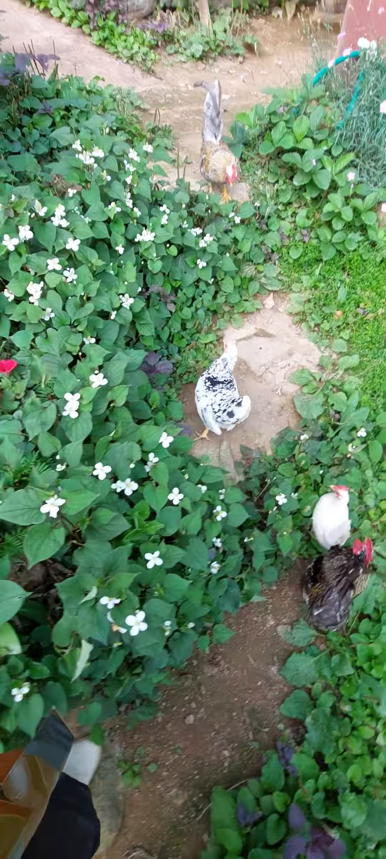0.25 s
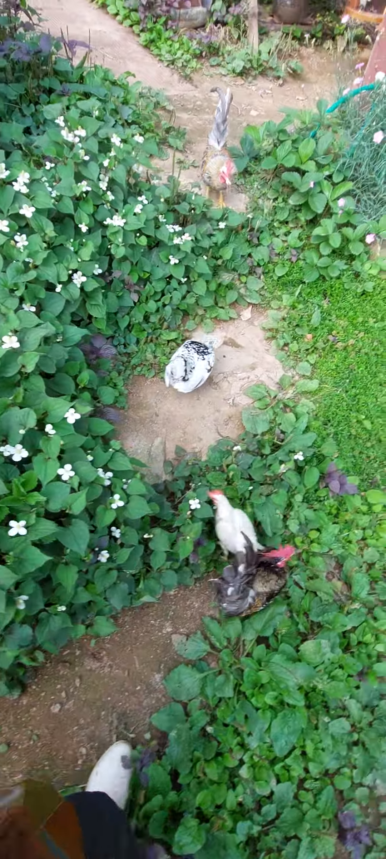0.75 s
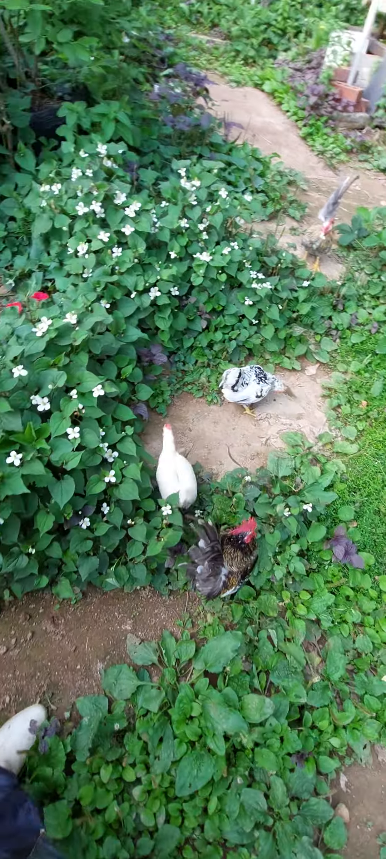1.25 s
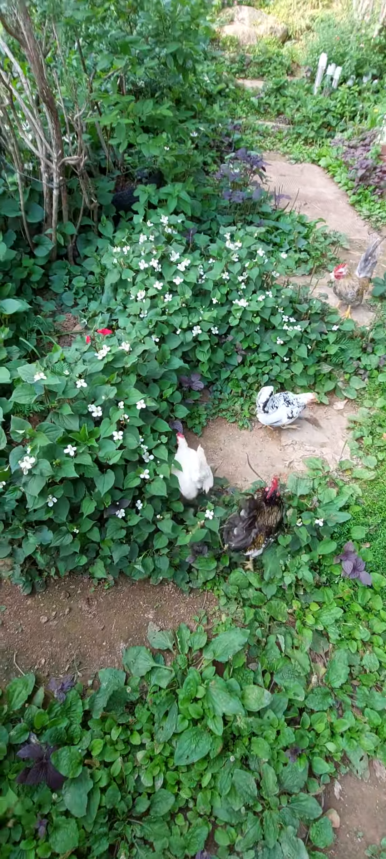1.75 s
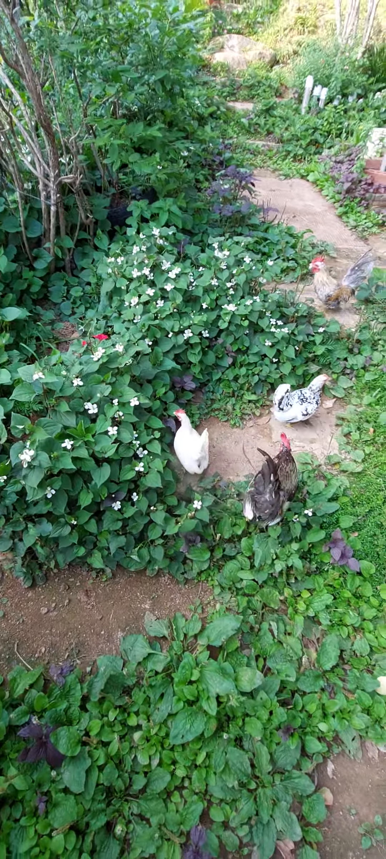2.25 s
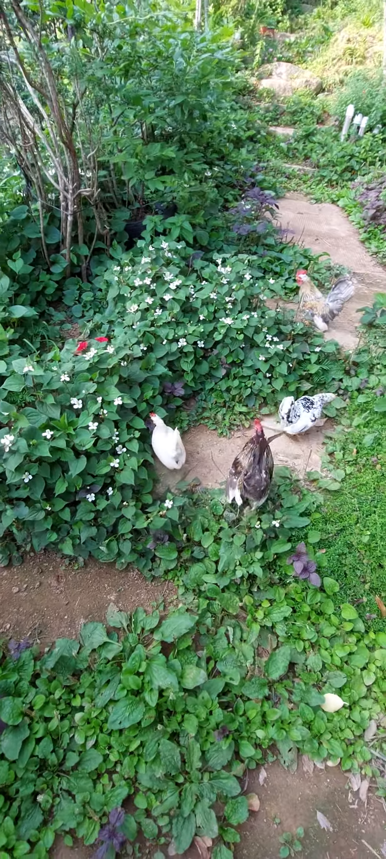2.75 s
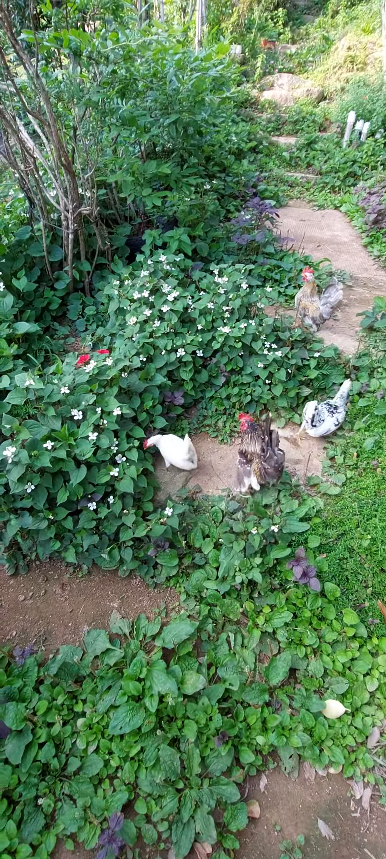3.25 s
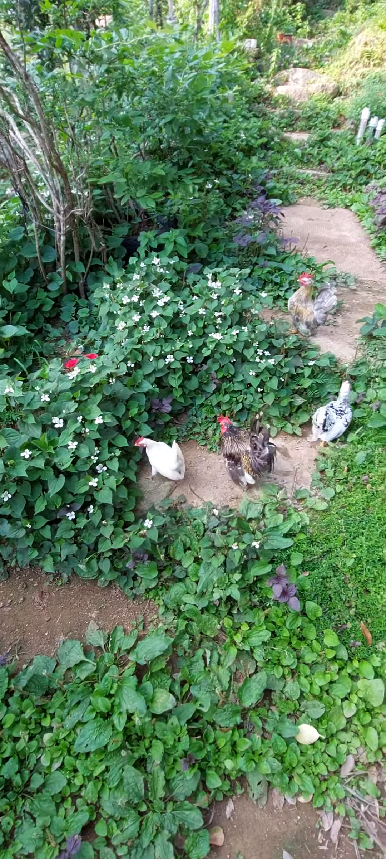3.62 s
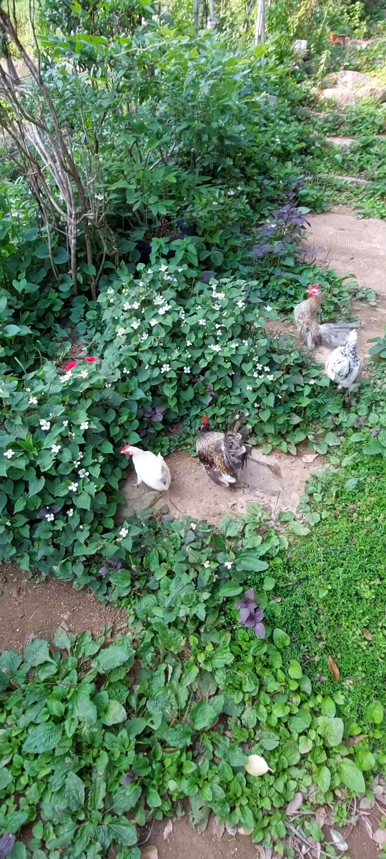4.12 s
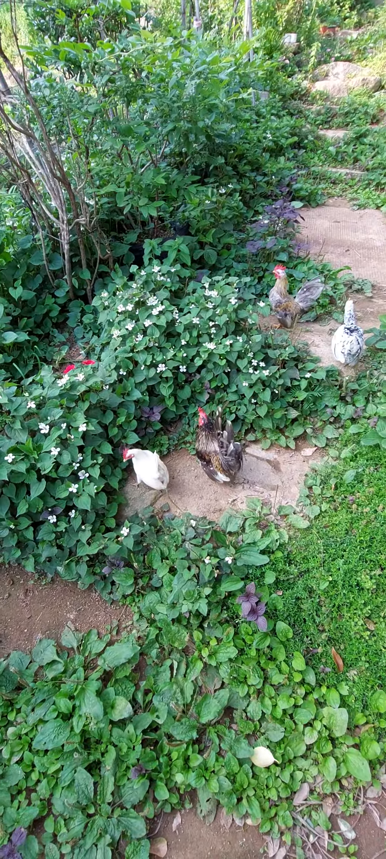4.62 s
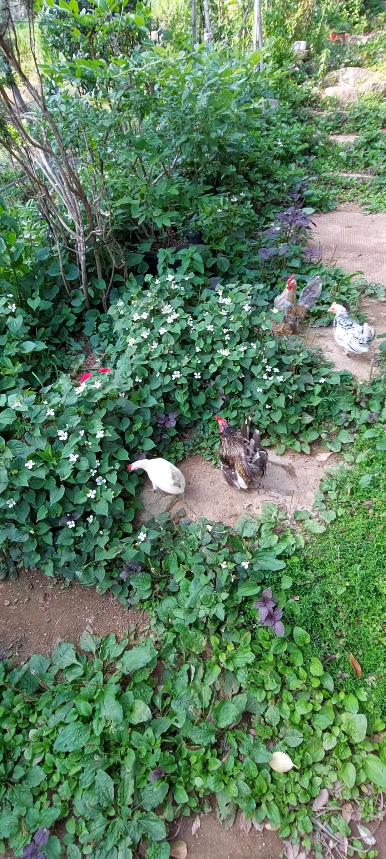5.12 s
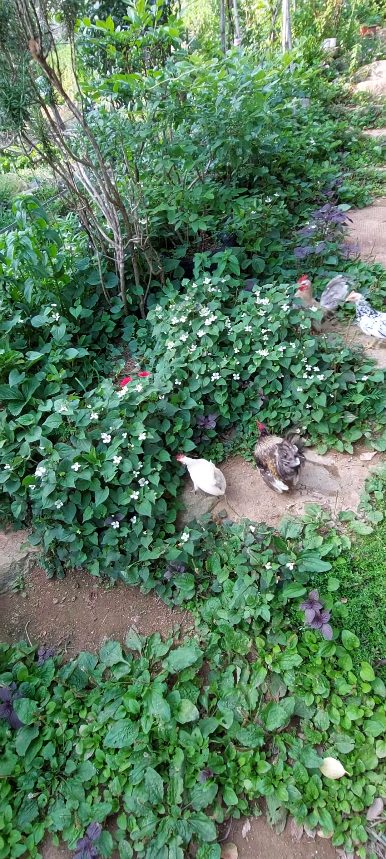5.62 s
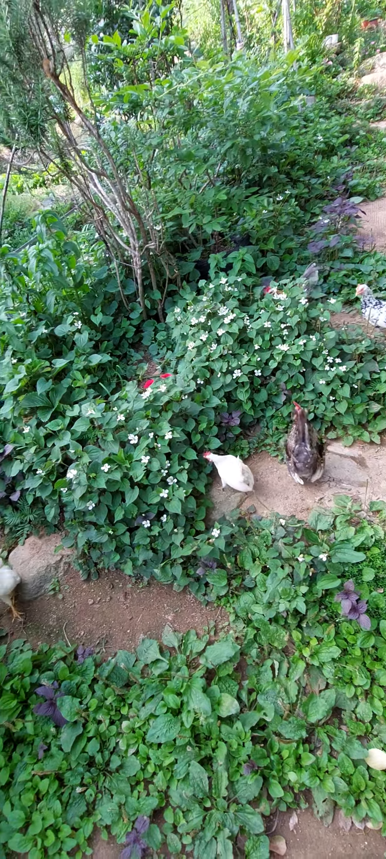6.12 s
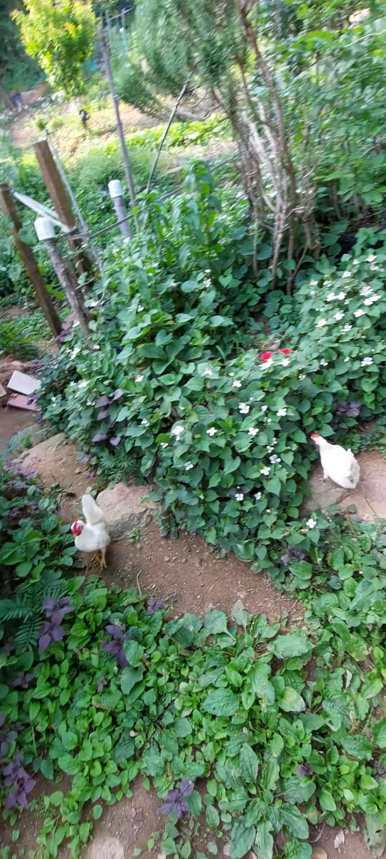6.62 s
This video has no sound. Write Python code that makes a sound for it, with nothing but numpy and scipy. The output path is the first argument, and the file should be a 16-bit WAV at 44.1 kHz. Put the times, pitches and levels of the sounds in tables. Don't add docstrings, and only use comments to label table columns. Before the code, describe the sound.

Short rising clucks from several hens, some round, some nasal or hoarse, overlap with brushing foliage, sharp ticks and small pecks on earth and stone. The clucking thins and drops to throaty croaks and squawks later. Dull low wind thumps hit mostly the right side twice, over a quiet open-air garden background, picked up by a phone a few steps away.

```python
import sys
import numpy as np
from scipy import signal
from scipy.fft import rfft, irfft
from scipy.io import wavfile
from scipy.ndimage import uniform_filter1d

SR = 44100
rng = np.random.default_rng(int(sys.argv[2]) if len(sys.argv) > 2 else 0)


def gain_from_db(level_db):
    decades = np.asarray(level_db, float) / 20
    return 10 ** decades


def to_wav(sig):
    pcm = np.clip(np.atleast_2d(sig), -1, 1) * 32767
    pcm = np.round(pcm).astype(np.int16)
    wavfile.write(sys.argv[1], SR, pcm.T)


N = 302790


def evened(x):
    return x / np.sqrt(np.mean(x ** 2) + 1e-20)


def read(points, hz):
    f, value = np.transpose(points)
    return np.interp(np.log(hz + 1), np.log(f + 1), value)


def curve(rows):
    s, level_db = np.transpose(rows)
    return np.interp(np.arange(N) / SR, s, level_db)


def swells(rows):
    s, db, rise_s, fall_s = np.transpose(rows)[:, :, None]
    t = np.arange(0, N + 64, 64) / SR
    below_peak_db = 20 * np.maximum((s - t) / abs(rise_s), (t - s) / abs(fall_s))
    return np.interp(np.arange(N) / SR, t, (db - below_peak_db).max(0))


def sides(pan_db):
    return gain_from_db(np.array([pan_db / 2, -pan_db / 2]))


def add(mix, s, sound):
    part = mix[:, round(s * SR):][:, :sound.shape[1]]
    part += sound[:, :part.shape[1]]


def colour(x, points):
    hz = np.fft.rfftfreq(x.shape[-1], 1 / SR)
    return irfft(rfft(x) * gain_from_db(read(points, hz)), x.shape[-1])


def ringing(edges_hz, size):
    band = signal.butter(2, edges_hz, "band", fs=SR)
    return signal.lfilter(*band, rng.standard_normal((2, size)))


def hiss(points, patchy_db, size):
    # (frequency [Hz], left-right likeness [0-1])
    likeness = [(290, 0.85), (640, 0.45), (1400, 0.07)]
    frames, hz = 4 * N // size + 5, np.fft.rfftfreq(size, 1 / SR)
    a, b, c, d, patches = rng.standard_normal((frames, len(hz), 5)).T
    patches = uniform_filter1d(patches, size=10, axis=0)
    patches = evened(uniform_filter1d(patches, size=8, axis=1))
    same = np.clip(read(likeness, hz), -1, 1)[:, None]
    left = a + 1j * b
    right = same * left + np.sqrt(1 - same ** 2) * (c + 1j * d)
    z = np.array([left, right]) * gain_from_db(read(points, hz)[:, None] + patchy_db * patches)
    return evened(signal.istft(z, nperseg=size, noverlap=3 * size // 4)[1][:, :N])


def cluck(length_s, hz0, hz1, db, top, second_db, third_db, fourth_db, higher_db, beak_db, attack_s,
          throat, rough, pan_db, lead):
    rasp_hz, rasp_width_hz = 944, 506
    air_db = -4
    swell_db_per_s = 1700
    rough = np.clip(rough, 0, .75)
    whole_s = length_s + .006
    u = np.arange(round(whole_s * SR)) / whole_s / SR

    wobble = uniform_filter1d(uniform_filter1d(rng.standard_normal((2, 7000)), size=90), size=90)
    wobble = evened(wobble)[:, :len(u)]
    hz = (hz0 + (hz1 - hz0) * np.sin(np.pi / 2 * u)) * (1 + .08 * rough * wobble[0])
    turns = np.cumsum(hz) / SR

    k = np.arange(1, 19)[:, None]
    uneven_db, lag, shift = rng.standard_normal((3, *k.shape))
    level_db = np.where(k > 4, higher_db + read(throat, k * hz) + 2.5 * uneven_db, 0)
    level_db = level_db + second_db * (k == 2) + third_db * (k == 3) + fourth_db * (k == 4)
    level_db = level_db + beak_db * (u - .5) * (k > 1)
    phase = 2 * np.pi * k * turns - .9 * k ** 2 + .5 * lag
    port_leads = (0, lead + .45 * shift * (k > 2))
    voice = np.array([(gain_from_db(level_db) * np.cos(phase + s)).sum(0) for s in port_leads])
    beat = 1 + rough * (.5 * np.cos(np.pi * turns) + 1.3 * rough * wobble[1])

    edges_hz = rasp_hz + rasp_width_hz * np.array([-.5, .5])
    rasp = evened(ringing(edges_hz, 7000))[:, -len(u):]
    air = evened(colour(rng.standard_normal((2, 7000)), [(1200, -60), *throat]))[:, :len(u)]
    air = gain_from_db(min(higher_db, 0) + air_db) * rough * air

    top = np.clip(top, .25, .8)
    rise = np.minimum(u * length_s / max(attack_s, 1 / SR), 1)
    rise = rise * gain_from_db(-swell_db_per_s * attack_s * np.maximum(1 - u / top, 0))
    fall = np.cos(np.pi / 2 * np.maximum(u - top, 0) / (1 - top)) ** 1.3
    sound = evened(voice) * beat + 1.5 * rough ** 2 * rasp + air
    return gain_from_db(db) * sides(pan_db)[:, None] * sound * rise * fall


def hedge(x):
    # (frequency [Hz], t60 [s])
    echo_t60 = [(300, 0.11), (1300, .14), (3000, .25), (6000, 0.34)]
    taps = np.zeros((2, SR // 2))
    at = np.arange(100, SR // 2 - 20, 20) + rng.integers(0, 20, (2, (SR // 2 - 101) // 20))
    np.put_along_axis(taps, at, rng.choice([-1., 1.], at.shape), 1)
    hz, t, z = signal.stft(taps, SR, nperseg=256)
    tail = signal.istft(z * gain_from_db(-60 * t / read(echo_t60, hz)[:, None]), SR, nperseg=256)[1]
    return signal.fftconvolve(x, tail / np.linalg.norm(tail[0]), axes=1)[:, :N]


def hens():
    # (frequency [Hz], level [dB])
    plain_throat = [(1700, 2.5), (2500, 4.5), (3200, -5.5), (4200, -8), (5500, -9.5), (6800, -31.5),
                    (9000, -27)]
    narrow_throat = [(2400, -16), (3300, -18), (4100, -5), (4700, -16), (5300, -28), (9000, -38)]
    far_throat = [(1700, 4), (2500, -1.5), (3200, -6.5), (4200, -13), (5000, -20.5), (6500, -24.5),
                  (9000, -46)]
    low_throat = [(1800, 5.5), (2400, -12), (2900, -8), (3500, -31), (4400, -20), (9000, -49.5)]
    open_throat = [(2400, -10), (3100, -5), (3600, -2), (4300, 0), (5000, -7), (5800, -14), (7000, -30),
                   (9000, -40)]
    hollow_throat = [(1800, 5.5), (2400, -10), (3000, -24), (3700, -22), (4500, -8), (5200, -16),
                     (6200, -40), (9000, -50)]
    # (loudest point [0-1], 2nd [dB], 3rd [dB], 4th [dB], higher overtones [dB],
    # their change as the beak moves [dB], attack [s])
    round_voice = (.6, -23, -33, -44, -50, -30, .004)
    nasal_voice = (.45, 5.5, -11, -20, -15, -7, .004)
    shrill_voice = (.65, -8, -9, -12, -11, -1, .005)
    hoarse_voice = (0.33, -14.5, -18, -20, -22, 3, .003)
    deep_voice = (0.5, 4.5, -6, -5.5, -14, -10, .003)
    plain_voice = (.5, 0, -9, -18, -18, -7, .004)
    soft_voice = (.4, 4, -10, -22, -18, -4, .002)
    croaking_voice = (0.4, 6, 7.5, 0.5, -10, -3, .004)
    squawking_voice = (0.35, 13.5, -2, 5.5, -5, 6.5, .001)
    moaning_voice = (2.2, -3, 20, 18, -3, -9, .003)
    sharp_voice = (.4, 12, 6, -5, -4, 0, .001)
    clear_voice = (.5, 10, 12.5, 4, -2.5, 4, .002)
    bright_voice = (.55, -9, -11, -22, -11, 0, .005)
    mild_voice = (.55, 1, -7, -26, -15, -4, .004)
    rasping_voice = (.4, 3, 2, 6, 8, 0, .002)
    # (time [s], length [s], first pitch [Hz], last pitch [Hz], level [dB])
    round_hen = [
        (0.629, 0.023, 640, 729, -27),
        (2.035, 0.031, 760, 740, -50.5),
        (2.195, 0.021, 576, 680, -34),
        (2.323, 0.038, 626, 840, -31),
        (2.476, 0.026, 527, 830, -31),
        (2.505, 0.0094, 780, 760, -32.5),
        (2.632, 0.038, 595, 750, -31.5),
        (6.241, 0.013, 700, 750, -55),
    ]
    nasal_hen = [
        (0.848, 0.026, 522, 560, -36),
        (2.256, 0.03, 542, 573, -30.5),
        (2.4, 0.023, 520, 573, -31),
    ]
    shrill_hen = [
        (1.394, 0.026, 680, 830, -25),
    ]
    hoarse_hen = [
        (1.247, 0.023, 758, 778, -39.5),
        (1.41, 0.024, 1029, 1158, -30),
        (1.562, 0.022, 705, 886, -36),
        (1.744, 0.018, 853, 950, -38.5),
        (1.893, 0.027, 773, 748, -45.5),
        (3.626, 0.028, 638, 730, -47),
        (5.882, 0.016, 700, 732, -40),
    ]
    deep_hen = [
        (3.658, 0.026, 507, 469, -39),
        (3.842, 0.022, 522, 498, -38.5),
        (4.025, 0.019, 570, 550, -49.5),
        (5.49, 0.045, 533, 532, -53),
        (5.868, 0.014, 582, 580, -42),
    ]
    plain_hen = [
        (0.579, 0.022, 680, 604, -56),
        (0.586, 0.012, 544, 500, -42.5),
        (0.82, 0.025, 660, 654, -25.5),
        (1.02, 0.019, 620, 645, -29),
        (1.239, 0.01, 580, 619, -30.5),
        (3.33, 0.13, 1058, 1027, -57.5),
    ]
    soft_hen = [
        (1.868, 0.02, 700, 790, -37),
        (2.095, 0.023, 590, 687, -32.5),
        (2.762, 0.022, 570, 554, -45),
        (2.866, 0.028, 590, 560, -37),
        (4.254, 0.022, 744, 742, -44),
        (5.588, 0.024, 694, 686, -57),
        (5.905, 0.03, 693, 656, -51),
    ]
    croaking_hen = [
        (4.135, 0.017, 376, 375, -47),
        (4.36, 0.045, 400, 350, -44),
        (4.508, 0.043, 387.5, 351, -45.5),
        (4.685, 0.037, 384.3, 363, -44),
        (5.63, 0.028, 355, 363, -41.5),
        (6.645, 0.031, 331.5, 324, -44),
        (6.698, 0.033, 380, 358, -53),
    ]
    squawking_hen = [
        (4.83, 0.029, 370.5, 371, -42),
        (5.137, 0.024, 427, 414, -38.5),
        (5.764, 0.022, 381, 373, -42),
    ]
    moaning_hen = [
        (0.212, 0.117, 391, 353, -53),
    ]
    sharp_hen = [
        (6.072, 0.025, 643, 558, -40),
    ]
    clear_hen = [
        (4.975, 0.02, 382, 366, -43),
        (6.359, 0.02, 320, 375, -39),
    ]
    bright_hen = [
        (1.726, 0.022, 650, 725, -34),
    ]
    mild_hen = [
        (1.951, 0.022, 625, 590, -37),
    ]
    rasping_hen = [
        (5.381, 0.02, 696, 612, -43),
    ]
    # (clucks, voice, throat, roughness [0-1], left-right [dB], lead of the right port [rad])
    flock = [
        (round_hen, round_voice, low_throat, .22, -4, -1.6),
        (nasal_hen, nasal_voice, narrow_throat, .22, 3, .6),
        (shrill_hen, shrill_voice, plain_throat, .22, 0, -.5),
        (hoarse_hen, hoarse_voice, plain_throat, .8, -1, -.6),
        (deep_hen, deep_voice, hollow_throat, .4, 3, -.8),
        (plain_hen, plain_voice, narrow_throat, .25, -1, -.5),
        (soft_hen, soft_voice, hollow_throat, .42, 2, 1.2),
        (croaking_hen, croaking_voice, low_throat, .6, 2, -1.4),
        (squawking_hen, squawking_voice, far_throat, .58, 1, -1.0),
        (moaning_hen, moaning_voice, low_throat, .12, 1, -.5),
        (sharp_hen, sharp_voice, far_throat, .42, 1, -1.0),
        (clear_hen, clear_voice, low_throat, .34, 2, -1.6),
        (bright_hen, bright_voice, open_throat, .2, 0, -.5),
        (mild_hen, mild_voice, open_throat, .2, 0, -.5),
        (rasping_hen, rasping_voice, far_throat, .7, 1, -1.0),
    ]
    out = np.zeros((2, N))
    for clucks, voice, throat, rough, pan_db, lead in flock:
        head_moves = rng.standard_normal((len(clucks), 2))
        for (s, *call), (turn, lean) in zip(clucks, head_moves):
            sound = cluck(*call, *voice, throat, rough, pan_db + 1.5 * turn, lead + .3 * lean)
            add(out, s - .002, sound)
    return out + gain_from_db(-13) * hedge(out)


def wind():
    # (middle [s], peak [dB], frequency [Hz])
    eddies = [(1.49, -20, 110), (1.506, -23, 170), (1.541, -21.5, 171), (1.645, -28, 67), (3.362, -27, 121),
              (3.392, -22.5, 113), (3.417, -20, 134), (3.468, -14, 230), (3.479, -8, 240),
              (3.492, -20, 200), (3.504, -29, 96), (3.538, -12.5, 165), (3.565, -41, 84), (5.363, -27, 97),
              (5.403, -7, 182), (5.415, -16, 130), (5.428, -16, 140), (5.44, -14, 110), (5.472, -5, 190),
              (5.483, -9, 200), (5.499, -7, 127), (5.524, -13, 130), (5.537, -8, 200), (5.55, -20, 150),
              (5.588, -12, 150), (5.598, -16, 130), (5.64, -14.5, 90), (5.8, -17.5, 218), (5.808, -27, 115),
              (5.836, -22, 96), (5.944, -29, 65.5), (6.254, -30, 227)]
    # (time [s], level [dB])
    breeze = [(0.02, -44.5), (0.4, -61.5), (0.71, -49), (1.16, -54.5), (1.25, -47.5), (1.4, -51),
              (1.74, -57.5), (2.41, -55.5), (3.19, -63), (3.45, -43), (3.78, -64), (4.0, -54), (4.67, -57),
              (5.26, -60.5), (5.95, -50.5), (6.5, -66), (6.84, -59)]
    # (frequency [Hz], level [dB per Hz])
    rumble = [(20, -30), (38, 5), (60, 0), (110, 1), (170, -10), (260, -8.5), (400, -18.5), (620, -50),
              (900, -80)]
    gust_under_eddy_db, gust_rise_s, gust_fall_s = 15, .06, .079
    lee_db = -56
    gusts = [(s, db - gust_under_eddy_db, gust_rise_s, gust_fall_s) for s, db, hz in eddies]
    level_db = np.maximum(curve(breeze), swells(gusts))
    gust_db = np.maximum(level_db - lee_db, 0)
    left_db = 3.0 - 1.0 * gust_db
    right_db = np.minimum(0.16 * gust_db, 3) - 1.0
    out = gain_from_db(level_db + np.array([left_db, right_db])) * hiss(rumble, patchy_db=3.0, size=2048)
    for s, db, hz in eddies:
        turns = np.arange(-2, 2, hz / SR)
        swing = np.cos(2 * np.pi * (turns + rng.random((2, 1))))
        swing *= np.cos(np.pi / 4 * turns) ** 2 * np.exp(-(turns / 0.62) ** 2)
        add(out, s - 2 / hz, gain_from_db(db + np.array([[-36], [-1]])) * swing)
    return out


def rustle():
    # (frequency [Hz], level [dB per Hz])
    leaves = [(180, -66), (300, 2.5), (404, 2), (510, -2), (896, -13.5), (1360, -8), (1470, -5.5),
              (3010, -9), (4550, -8), (8700, -14), (11700, -9), (15800, -21)]
    # (peak time [s], level [dB], rise for 20 dB [s], fall for 20 dB [s])
    strokes = [(0.04, -62, .1, .4), (0.33, -53.5, .4, .15), (0.45, -66, .4, 1.5), (0.71, -51, .12, .35),
               (0.85, -53, .3, .4), (2.27, -60, .3, .12), (2.91, -61, .1, .1), (3.82, -69, .04, .6),
               (1.21, -52, .15, .22), (1.41, -52, .4, 1.45), (2.47, -51, .08, .17), (2.8, -62, 1.2, .6),
               (3.37, -59.5, .45, .35), (3.6, -65.5, .5, .27), (4.15, -49, .29, .13), (4.3, -70, .1, .3),
               (4.83, -67, .8, .3), (5.15, -69, .012, .03), (5.65, -64, .021, .09), (5.8, -60, .05, .06),
               (5.88, -54.5, .027, .055), (5.99, -74, .04, .045), (6.085, -66, .015, .03),
               (6.22, -84, .03, .06), (6.84, -76, .6, .4)]
    clicks_per_s = 1500
    clicks = gain_from_db(3.5 * np.minimum(rng.exponential(1, (2, N)), 3))
    clicks *= rng.random((2, N)) < clicks_per_s / SR
    grit = evened(colour(clicks * rng.choice([-1, 1], (2, N)), leaves))
    rub = hiss(leaves, patchy_db=2.2, size=256) + .3 * grit
    return gain_from_db(swells(strokes) + np.array([[4], [2.2]])) * rub


def snaps():
    # (time [s], peak [dB], t60 [s], low part [dB])
    dry_snaps = [(0.6502, -52.5, 0.83, 4), (1.2, -42, 0.13, -1), (1.4944, -45, 0.058, -1),
                 (1.555, -43.5, 0.13, 7), (1.77, -43, 0.058, -2), (2.0411, -52, 0.3, 4),
                 (2.4593, -37, 0.12, 2.5), (3.048, -56, 0.25, 6), (3.3635, -55.5, 0.51, 8.5),
                 (4.031, -66, 0.051, 3), (4.293, -56.5, 0.07, -23), (4.455, -58.5, 0.033, -37),
                 (4.766, -65, 0.26, 12), (5.7942, -44.5, 0.12, -27), (5.87, -42, 0.065, -34),
                 (5.97, -57.5, 0.16, -18), (6.1744, -78, 0.14, -14)]
    # (time [s], peak [dB], low part [dB])
    ticks = [(0.2074, -57, -2), (0.3215, -39, -8), (1.3368, -46.5, 12.5), (1.6741, -41, -6),
             (3.969, -56, -3), (4.0942, -45, 3), (4.1457, -37, 4), (4.152, -38, 1), (4.2398, -54, 4),
             (5.258, -59.5, 6.5), (6.2145, -56.5, -6)]
    tick_t60_s, attack_s = 0.024, 0.00099
    out, t = np.zeros((2, N)), np.arange(8000) / SR
    for s, db, t60_s, low_db in dry_snaps + [(s, db, tick_t60_s, low_db) for s, db, low_db in ticks]:
        burst = rng.standard_normal((2, len(t))) * gain_from_db(-60 * t / t60_s) * np.minimum(t / attack_s, 1)
        tone = [(300, low_db - 79), (1000, low_db + 1.5), (3500, low_db - 12.0),
                (5500, -4.0), (8600, -7.5), (12000, -5.0), (16000, -11.0)]
        add(out, s, gain_from_db(db + 8.0) * sides(0.93)[:, None] * colour(burst, tone))
    return out


def pecks():
    # (time [s], peak [dB], ring [Hz], length [s])
    taps = [(1.205, -42, 330, .012), (1.336, -41, 900, .005), (1.37, -55, 2700, .01),
            (2.158, -58, 3800, .012), (2.17, -50, 450, .008), (3.05, -52, 350, .02),
            (3.065, -50, 2000, .008), (3.354, -48, 1000, .01), (3.39, -62, 2300, .08),
            (3.97, -54, 1800, .008), (4.028, -52, 1700, .014), (4.03, -50, 620, .02),
            (4.088, -53, 1900, .016), (4.138, -50, 1700, .02), (4.14, -48, 600, .018),
            (5.258, -63, 2600, .008), (5.29, -66, 2500, .09), (5.866, -42, 1150, .008),
            (6.214, -56, 1400, .005)]
    half_width = .16
    out = np.zeros((2, N))
    for s, db, hz, length_s in taps:
        spread = np.clip(half_width * np.sqrt(.01 / length_s), .03, .5)
        u = np.arange(round(length_s * SR)) / length_s / SR
        ring = ringing(hz * (1 + spread * np.array([-1, 1])), 6000)[:, -len(u):]
        both = evened(ring + .5 * ring[::-1])
        add(out, s, gain_from_db(db) * both * np.sin(np.pi * np.sqrt(u)) ** 2)
    return out


def garden():
    # (frequency [Hz], level [dB per Hz])
    hum_colour = [(88, -1), (150, -3.5), (492, 1.5), (1300, -9), (2040, -15.5), (3390, -25), (5000, -28.5),
                  (6320, -29), (11100, -30), (15800, -34)]
    # (time [s], level [dB])
    stir = [(0, 0), (1, 0), (2.4, 0), (3.1, 0), (3.45, 1), (3.62, -2), (3.76, -6), (3.9, 0), (4.9, 0),
            (5.08, -5), (5.3, -2), (5.45, 2), (5.72, -4), (6.1, -1), (6.2, -3), (6.32, -7), (6.45, 0),
            (6.87, 1)]
    hum_db, stir_hz = -56, 2100
    hum = gain_from_db(hum_db) * hiss(hum_colour, patchy_db=2.2, size=1024)
    low = signal.sosfiltfilt(signal.butter(3, stir_hz, fs=SR, output="sos"), hum)
    return low + gain_from_db(curve(stir)) * (hum - low)


def scene():
    return hens() + wind() + rustle() + snaps() + pecks() + garden()


def top_cut(x):
    return signal.sosfilt(signal.butter(12, 16400, fs=SR, output="sos"), x)


def record(dry):
    thin = signal.sosfilt(signal.butter(4, 44, "high", fs=SR, output="sos"), dry)
    edge = signal.firwin(801, 15760, window=("kaiser", 9), fs=SR)
    return top_cut(signal.oaconvolve(thin, edge[None], "same"))


dry = scene()
out = record(dry)
to_wav(out)
```